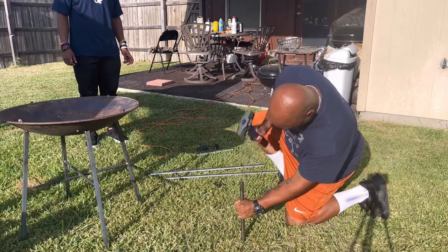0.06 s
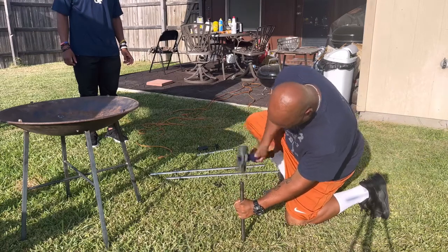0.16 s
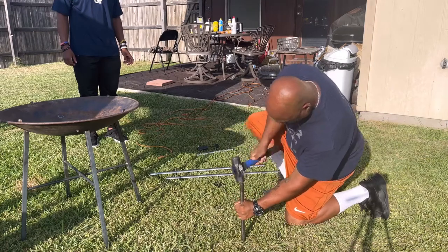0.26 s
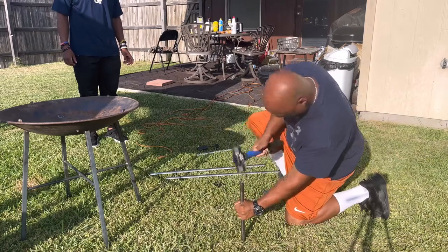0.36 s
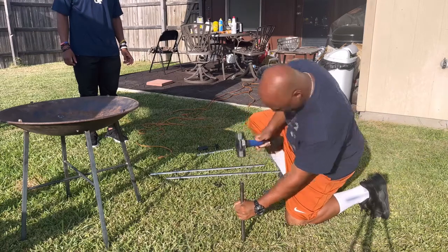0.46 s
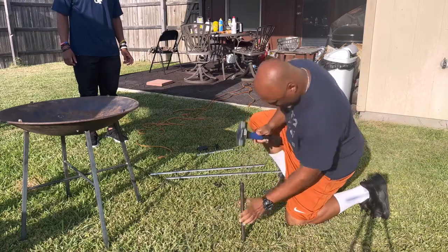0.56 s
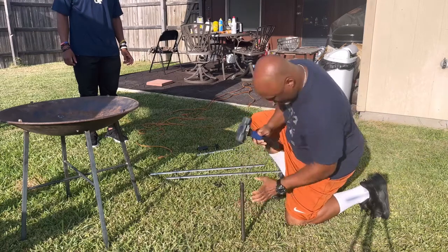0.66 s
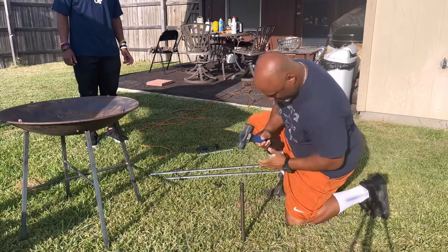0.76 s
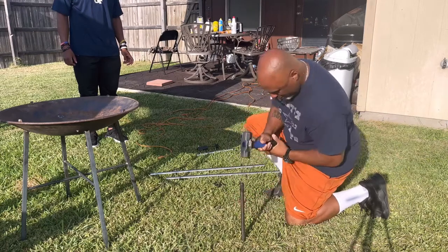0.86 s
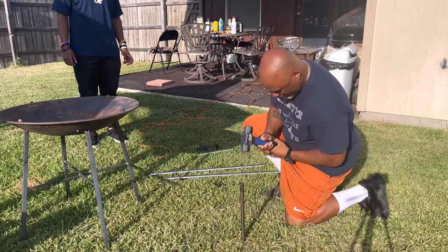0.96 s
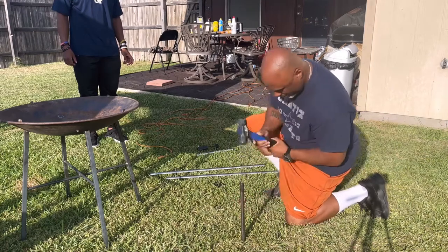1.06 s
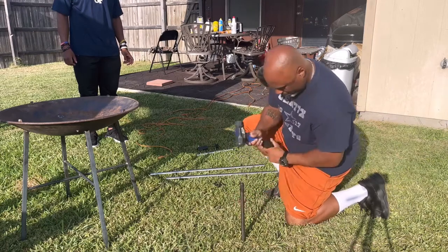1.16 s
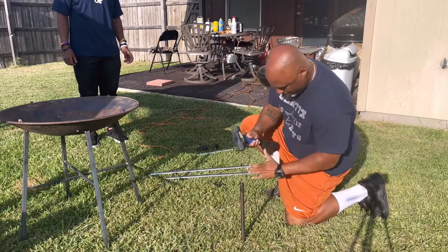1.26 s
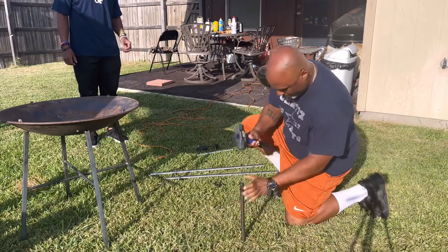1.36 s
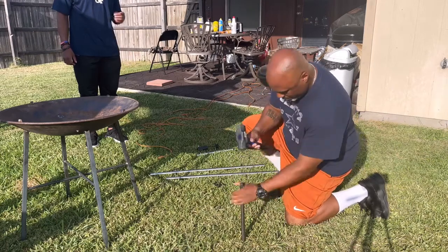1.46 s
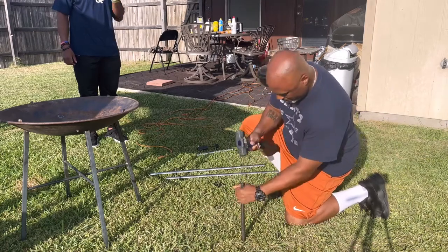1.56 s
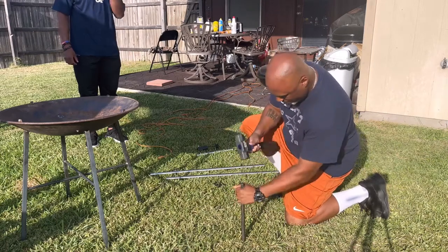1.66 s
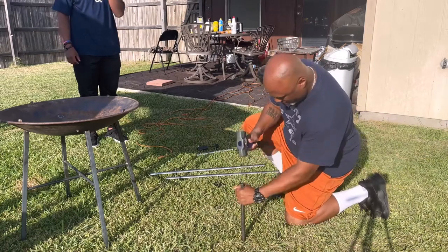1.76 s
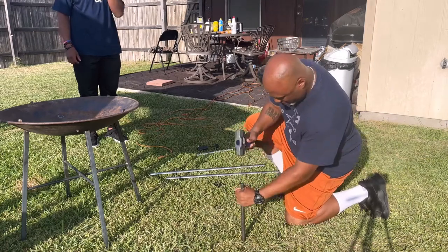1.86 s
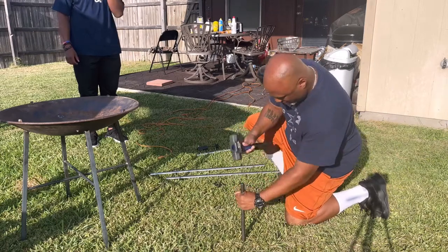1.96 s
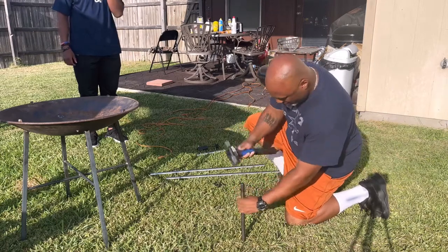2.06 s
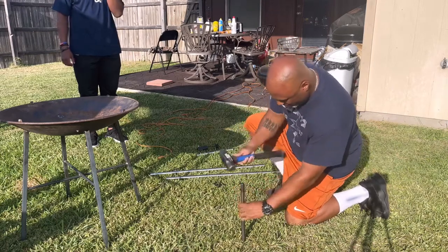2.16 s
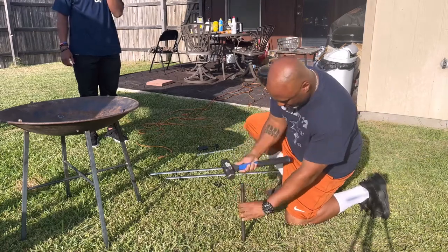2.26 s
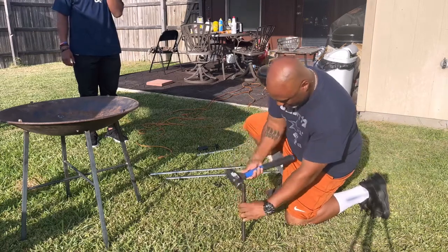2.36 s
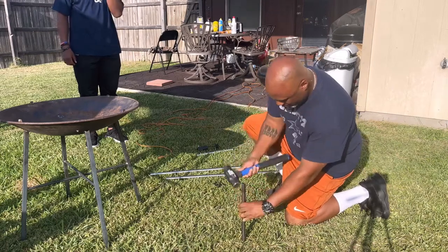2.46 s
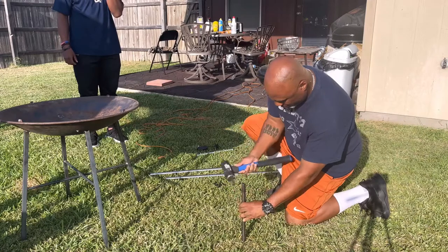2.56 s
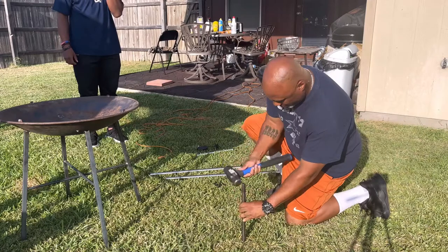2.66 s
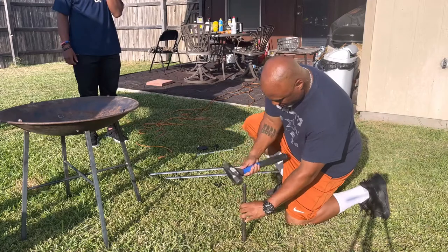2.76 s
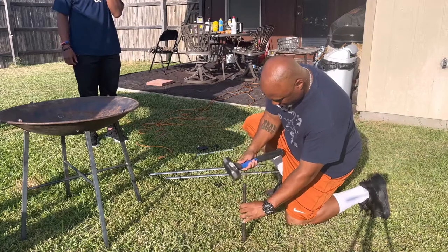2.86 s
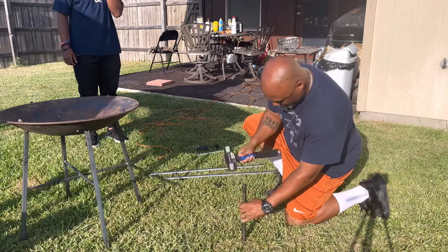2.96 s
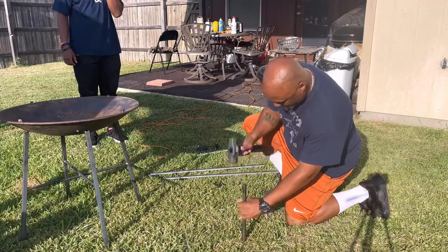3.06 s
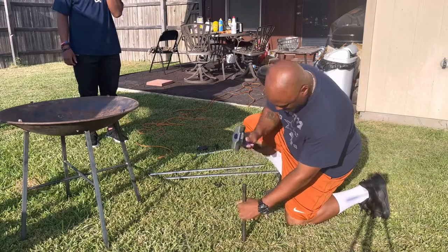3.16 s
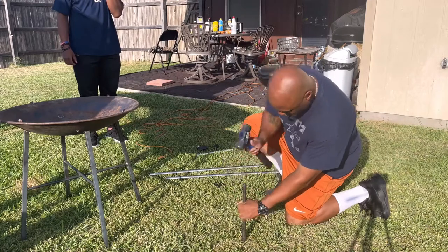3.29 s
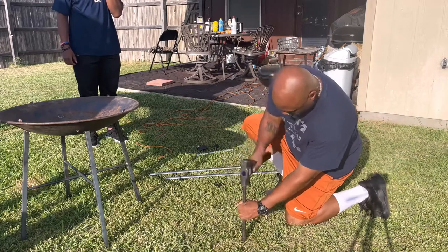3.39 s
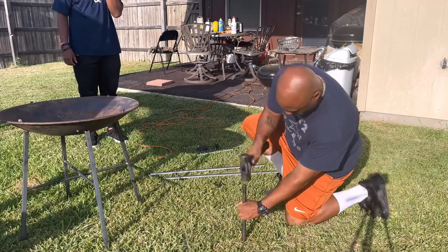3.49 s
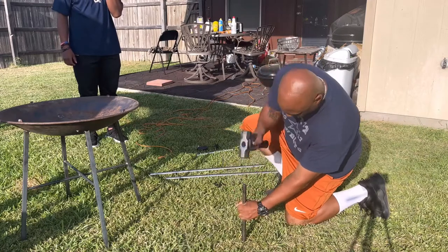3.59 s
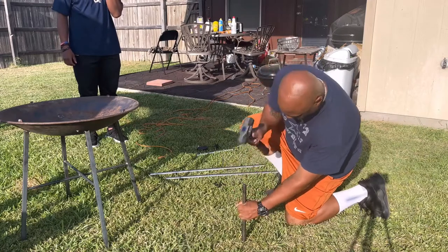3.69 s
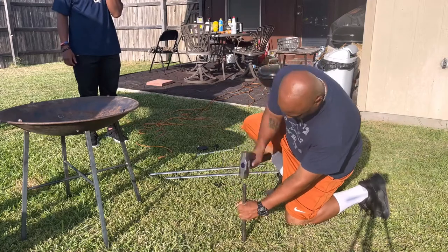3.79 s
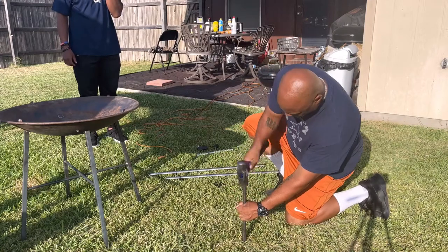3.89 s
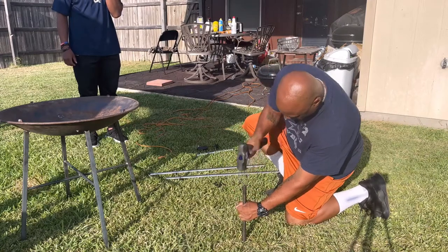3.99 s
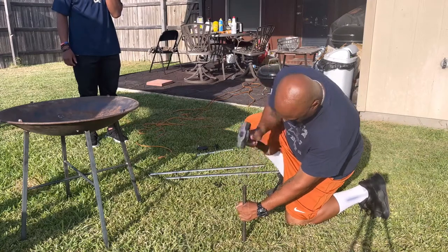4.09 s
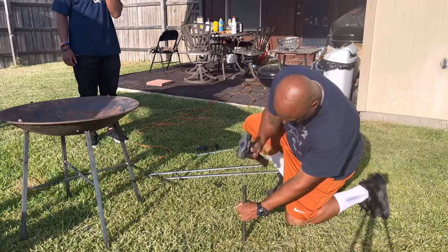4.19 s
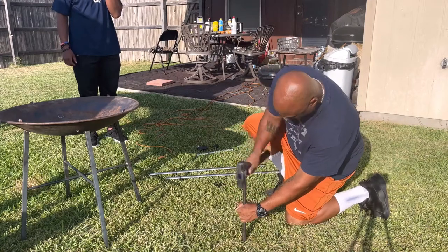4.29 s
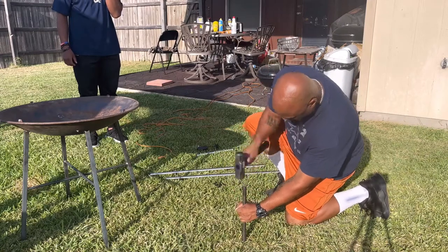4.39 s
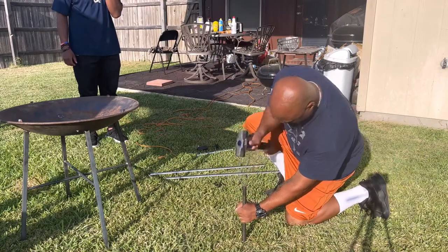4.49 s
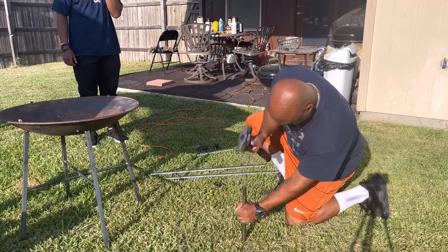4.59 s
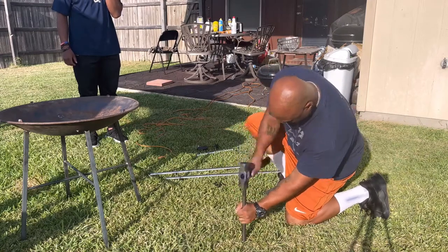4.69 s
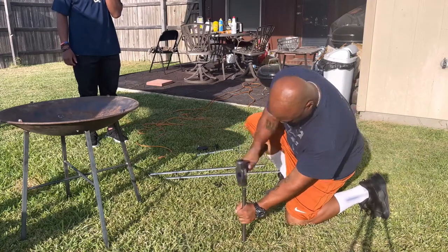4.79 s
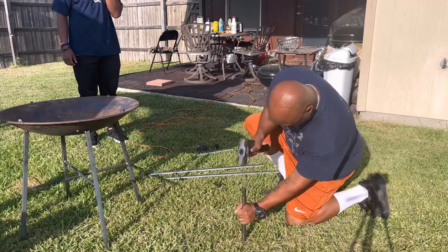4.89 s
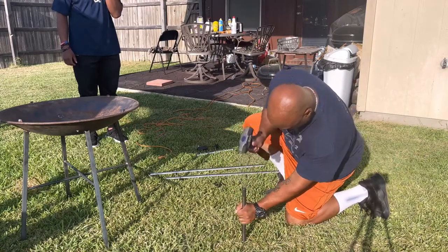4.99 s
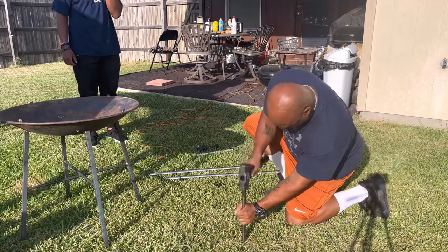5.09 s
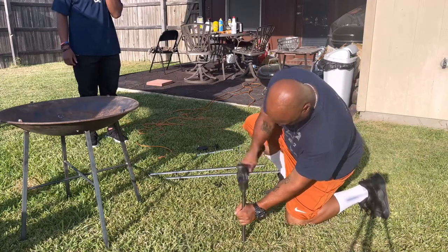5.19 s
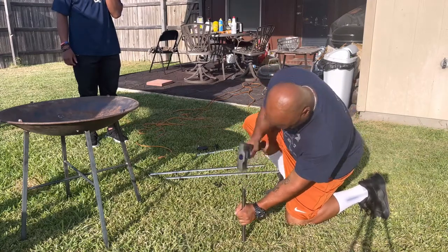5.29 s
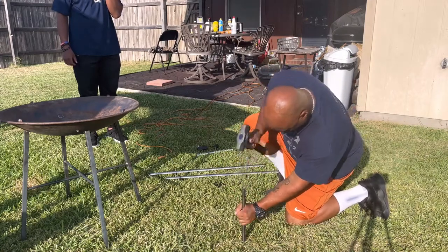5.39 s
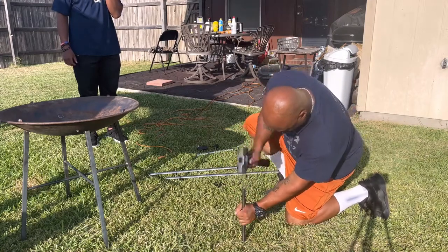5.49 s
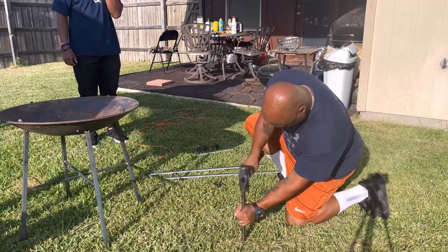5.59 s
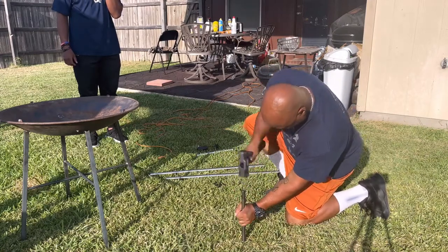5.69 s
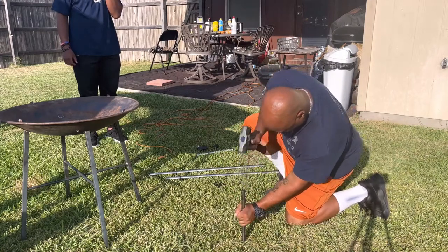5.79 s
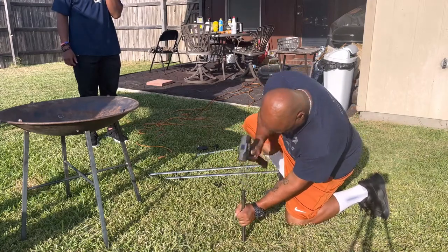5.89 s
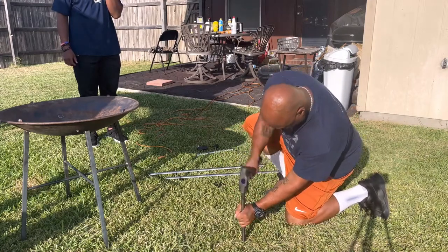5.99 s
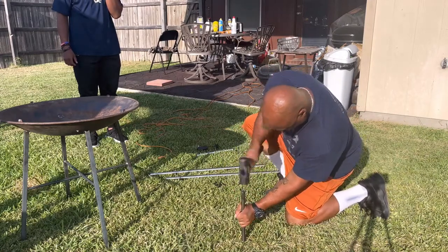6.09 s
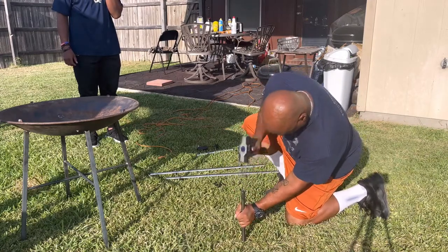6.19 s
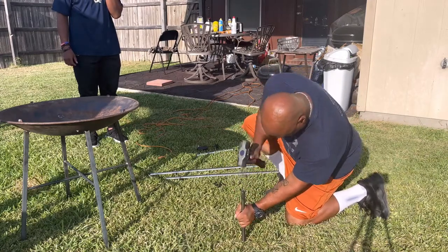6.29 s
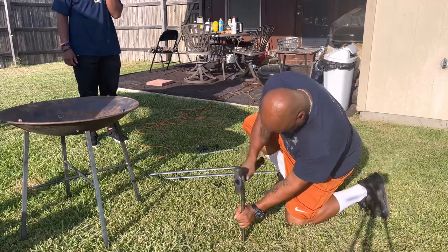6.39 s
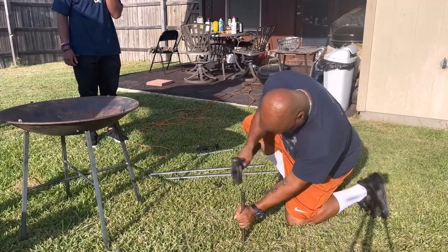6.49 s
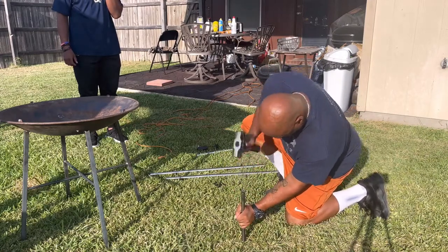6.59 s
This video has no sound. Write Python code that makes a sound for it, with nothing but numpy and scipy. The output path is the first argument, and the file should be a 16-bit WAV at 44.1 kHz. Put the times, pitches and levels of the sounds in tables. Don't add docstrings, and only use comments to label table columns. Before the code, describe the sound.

A hand hammer cracks sharply on a steel stake in a lawn, one blow, a pause, light taps, then steady hard blows with yard echoes.

```python
import sys
import numpy as np
from scipy import signal
from scipy.fft import rfft, irfft, next_fast_len
from scipy.io import wavfile

SR = 44100
rng = np.random.default_rng(int(sys.argv[2]) if len(sys.argv) > 2 else 0)


def natural_amplitude(level_db):
    exponent = np.asarray(level_db, float) / 20
    return 10 ** exponent


def store_wav(level_fs):
    pcm = np.round(np.clip(np.atleast_2d(level_fs), -1, 1) * 32767)
    wavfile.write(sys.argv[1], SR, pcm.T.astype(np.int16))


N = 293265
LEAD = SR // 2

# time_s, level_db
BREEZE = [(0.0, -55.5), (0.35, -49), (0.7, -59), (0.91, -56.5), (1.3, -48.5), (1.47, -50.5), (1.55, -65.5),
          (2.18, -71.5), (2.75, -54.5), (3.1, -70.5), (3.7, -59), (4.31, -58), (5.0, -54), (5.74, -55.5),
          (6.65, -57)]
# peak_s, peak_db, left_minus_right_db, half_width_s
GUSTS = [(0.43, -42.5, -6, 0.036), (0.67, -52, 0, .015), (0.91, -55, 1.5, 0.013), (1.131, -44, -6, 0.023),
         (1.26, -35.5, -3, 0.0085), (1.421, -43.5, -3, 0.0075), (1.95, -61, 3, .04), (2.18, -59, 7, 0.023),
         (2.59, -59, 9, 0.026), (2.798, -37.5, -2.5, 0.013), (4.32, -53, -1, 0.025),
         (5.091, -47.5, -5, 0.037), (5.23, -66, -1.5, 0.005), (5.371, -51.5, -2, 0.019),
         (5.632, -45.5, -5, 0.031), (5.77, -46, -3, 0.019), (6.02, -49, -2, 0.025), (6.18, -55, 3, 0.012),
         (6.398, -49, 1.5, 0.028)]

# pitch_hz, density_db (per Hz)
FAR_SPECTRUM = [(18, -37), (30, -7), (70, -2), (124, -12), (394, -9.5), (600, -9), (1320, -12),
                (2750, -39.5), (4300, -35.5), (8520, -56), (9970, -47.5), (10800, -63), (16000, -72.5)]
# pitch_hz, likeness (-1 to 1)
FAR_LIKENESS = [(60, 0.31), (180, 0.81), (550, -0.47), (1650, -0.21), (4970, 0.48), (15000, 0.38)]

# time_s, level_db
HUM_LEVEL = [
    (0.0, -68),
    (0.35, -66.5),
    (0.54, -57),
    (0.63, -67.5),
    (0.8, -56.5),
    (1.17, -68.5),
    (1.6, -77),
    (1.9, -89),
]
# pitch_hz, level_db
HUM_LINES = [
    (154, -5.5),
    (308, 1.5),
    (460, -5.5),
    (616, -12),
]

# contact_s, strength_db, glancing (up to 1, below 0 dead square), head_twist (0-1), off_centre (0-1)
BLOWS = [(0.196, -14, -0.29, 0, 0), (2.3358, -26, 0.93, 0.026, 0.3), (2.69, -24, 0.79, 0.33, .1),
         (3.3902, -13, -0.11, 0.017, 0.53), (3.826, -11.5, 0.02, 0, 0),
         (4.2615, -10.5, -0.076, 0.093, 0.57), (4.6921, -11, -0.12, 0.098, 0.34),
         (5.11, -11.5, -0.27, 0, .95), (5.5395, -12, -0.007, 1, 0.18), (5.9624, -11.5, -0.03, 0.13, 0.22),
         (6.3592, -12, -0.058, 0.089, 0)]
# pitch_hz, level_db, t60_s
STAKE_MODES = [
    [(1930, -5.5, 0.013), (2127, 1.5, 0.015), (2187, -8.5, 0.005), (2650, -7.5, 0.004)],
    [(782.2, -9, 0.096), (1021.4, 5, 0.024)],
    [(1286, -4, 0.032), (1530, -2, 0.014)],
    [(2850, -6.5, 0.015), (3112, 2, 0.014), (3404, 1, .014)],
    [(3520, -4, 0.004), (3920, 0.5, 0.027)],
]
HEAD_MODES = [
    [(5244, 1, 0.041), (5425, 3.9, 0.044), (5510, -4.5, .02)],
    [(4708, 0.011, 0.054), (4610, -9.5, 0.02)],
    [(6640, 9.5, .018), (6390, -11.5, .012)],
    [(8520, 0.0042, 0.033)],
]
FACE_MODES = [
    [(10320, 0, .014), (10920, 1, 0.028)],
    [(9610, 0.0019, 0.034)],
    [(13000, 0, .01)],
    [(15550, 0.0085, .04)],
]
RADIATION = [
    (17.9, 21.84, 19.7, 24.4, 21),
    (17.36, 23.7, 16.5, 18),
    (17.34, 22, 17, 15),
]
# near_2200hz_db, near_900hz_db, near_1400hz_db, near_3100hz_db, near_4000hz_db
STAKE_SHARE = [
    (0.22, -8, -9.5, -7, -23),
    (-3, -14.5, 5.5, 3, 21),
    (-0.1, 0.5, -5.7, 3.5, 12),
    (0, -3, -3.8, 4.5, -2.1),
]
# near_5400hz_db, near_4700hz_db, near_6500hz_db, near_8500hz_db
HEAD_SHARE = [
    (-4.5, -14, -7.5, -10),
    (6, -4.3, 2.5, -1.6),
    (-7, 18.5, 8, 4),
    (-1.5, 0.4, 2.1, -0.45),
]
# near_10800hz_db, near_9600hz_db, near_13000hz_db, near_15500hz_db
FACE_SHARE = [
    (-4.5, -17, -29, -8.5),
    (4, -1, -12.5, -4),
    (0.6, 3.2, 4.4, 3.5),
    (-7, 24.5, 10, -5),
]
# fast_wave_db, slower_wave_db, slowest_wave_db
SOIL_SHARE = [
    (-7, -14.5, -22),
    (-8.5, 17.5, 3),
    (-2.5, 2.5, 10.5),
    (-1.8, 0.8, 0),
]
# narrow_db, broad_db
CLACK_SHARE = [
    (-11, 4.2),
    (22, 2),
    (4.5, -1.5),
    (-0.8, -3.4),
]
# pitch_hz, level_db, rise_s, t60_s
SOIL_WAVES = [
    [(436, -4.5, 0.0037, 0.026), (282, -4.5, 0.0076, 0.01)],
    [(152, 3, 0.013, 0.056)],
    [(81, 3, 0.02, 0.05)],
]

# pitch_hz, left_minus_right_db
PORT_SHADE = [(300, -2), (600, -2.5), (1500, -6), (2000, -1), (3700, 2), (4600, -9), (5400, -3),
              (6500, -11.5), (7600, -8), (10000, 0.5), (15500, -2)]
# pitch_hz, left_lead_rad
PORT_LEAD = [(300, 0), (600, -.6), (1500, -.1), (2000, -1), (3700, -2.3), (4400, -3.1), (5400, -5),
             (7600, -7.3), (8500, -6), (10000, -5.1), (12500, -3.2), (15500, -.3)]
# delay_s, level_db
LAWN_ECHO = (.0045, -9)
# delay_s, left_db, right_db, smear_s
YARD_ECHOES = [(.0135, 10, 10.5, 0.0026), (.0185, 5, 9, 0.0041), (.024, -1, -0.5, .003),
               (0.04, 10, 6.5, 0.0034), (0.045, 7, 7.5, .003), (0.059, 3, -19, 0.0016),
               (0.083, 2, 13.5, 0.0019), (.099, 5, 13, 0.0011), (.126, -11, 13.5, 0.00098),
               (0.14, 11, 11.5, 0.0033), (0.152, 13.5, 5.5, 0.0015), (0.164, -5.5, 6, 0.0059),
               (0.19, 8, 7, 0.002), (0.228, -7, 7.5, 0.0026)]
# pitch_hz, left_db, right_db, t60_s
YARD_TAIL = [(150, -48, -44.5, 0.05), (348, -41, -41.5, 0.15), (790, -52.5, -54.5, 0.41),
             (1300, -47.5, -48.5, 0.53), (2200, -52, -48.5, 0.51), (3330, -56.5, -57, 0.47),
             (4000, -46, -42, 1), (4700, -52.5, -41.5, 0.57), (5700, -51.5, -35.5, 0.62),
             (7370, -45, -49, 0.44), (9300, -51.5, -52, 0.45), (12000, -55, -53.5, 0.16),
             (16700, -47.5, -45, .45)]
# delay_s, left_db, right_db
FENCE_SLAP = [
    (0.0838, -16, -9),
    (0.0911, -28, -15),
]

# peak_s, level_db, half_width_s
RUSTLES = [
    (0.99, -87, .02),
    (1.139, -80, .045),
    (1.9, -87, .04),
    (2.11, -95, .015),
]
# start_s, peak_db
TICKS = [
    (0.5294, -87),
    (0.5794, -90.5),
    (0.6848, -64),
    (0.9794, -74),
    (1.0594, -86),
]
# start_s, peak_db, length_s, start_hz
CHIRPS = [
    (0.77, -87, .03, 3930),
    (0.893, -69, .09, 4490),
    (1.28, -81, .08, 4100),
    (1.396, -71, .09, 4750),
    (1.496, -81, .12, 4700),
    (1.784, -72, 0.078, 4390),
    (1.92, -80.5, .12, 4250),
    (3.23, -83, .09, 4170),
]


def rms_one(x):
    return x / np.sqrt(np.mean(x ** 2) + 1e-20)


def in_time(rows, outside=None):
    s, *columns = np.transpose(rows)
    return [np.interp(np.arange(N) / SR, s, c, outside, outside) for c in columns]


def at_hz(rows, hz, order=1):
    rows = np.array(rows)
    return np.interp(np.log(hz), np.log(rows[:, 0]), rows[:, order])


def band(x, low_hz, high_hz, order=2):
    edges = [low_hz, min(high_hz, .45 * SR)]
    return signal.sosfilt(signal.butter(order, edges, "band", fs=SR, output="sos"), x)


def drift(rate_hz, channels=1):
    r = np.exp(-2 * np.pi * rate_hz / SR)
    white = rng.standard_normal((channels, N + LEAD))
    return rms_one(signal.lfilter([1], [1, -2 * r, r * r], white)[:, LEAD:])


def bump(s, width):
    return np.exp(-.5 * ((np.arange(N) / SR - s) / max(width, .003)) ** 2)


def half_octaves(count):
    edges = 90 * 2 ** np.arange(0, count / 2, .5)
    return zip(edges, edges[1:])


def wind():
    power = natural_amplitude(in_time(BREEZE)[0] + 2.5 * drift(14.0, channels=2)) ** 2
    for s, peak_db, pan_db, width in GUSTS:
        port_db = peak_db + pan_db * np.array([[.5], [-.5]])
        power = power + (natural_amplitude(port_db) * bump(s, width)) ** 2
    level_db = 10 * np.log10(power)
    lump_db = 2.7 * drift(38, channels=2)
    white = .5 * rng.standard_normal(N) + rng.standard_normal((2, N))
    rumble = rms_one(band(white, 42, 105) * natural_amplitude(lump_db))
    flutter_db = -21.5 + 0.32 * lump_db + 0.71 * (level_db + 51.5)
    flutter = rms_one(band(white, 105, 190, order=3)) * natural_amplitude(flutter_db)
    return natural_amplitude(level_db + 3.5) * (rumble + flutter)


def far_field():
    out, white = 0, rng.standard_normal((2, 2, N))
    for k, (low, high) in enumerate(half_octaves(15)):
        mid, side = band(white[k % 2], low, high, order=3)
        hz = np.sqrt(low * high)
        alike = np.clip(at_hz(FAR_LIKENESS, hz), -1, 1)
        stereo = np.sqrt(1 + alike) * mid + np.sqrt(1 - alike) * side * [[1], [-1]]
        out = out + natural_amplitude(at_hz(FAR_SPECTRUM, hz)) * stereo
    return natural_amplitude(-58.5 + 0.5 * drift(7.5)) * rms_one(out)


def insects():
    return natural_amplitude(-84.5) * rms_one(band(rng.standard_normal((2, N)), 9250, 10300, order=7))


def hum():
    turns = np.cumsum(1 + 0.016 * drift(3.4)[0]) / SR
    tones = sum(natural_amplitude(db - 2.5) * np.sin(2 * np.pi * hz * turns) for hz, db in HUM_LINES)
    return natural_amplitude(in_time(HUM_LEVEL, outside=-91.0)[0]) * tones


def shares(table):
    rows = np.array(BLOWS)
    levels = np.array(table[0]) + rows[:, 2:] @ np.array(table[1:])
    levels[:, 0] += rows[:, 1]
    return [tuple(row) for row in levels]


def steel(body, radiation_db, levels_db, t):
    grip_damping = 0.68
    contact_spread = 1.12
    out = 0
    for modes, gain_db in zip(body, np.add(radiation_db, [0, *levels_db[1:]])):
        hz, level_db, t60 = np.transpose(modes)[:, :, None]
        luck = rng.standard_normal((3, len(modes), 1))
        decay = natural_amplitude(level_db + 2.7 * luck[0] - 60 * t / t60 / grip_damping)
        struck_hz = hz * (1 + 0.0038 * luck[1])
        rings = decay * np.sin(2 * np.pi * struck_hz * t + 3 * luck[2])
        contact = band(rng.standard_normal(len(t)), hz.min() / contact_spread, hz.max() * contact_spread)
        crack = rms_one(contact) * natural_amplitude(-2.5 - 60 * t / 0.018)
        squeeze = (1 - np.exp(-t / 0.00081)) ** 2
        group = (rings.sum(axis=0) + crack) * squeeze
        out = out + natural_amplitude(levels_db[0] + gain_db) * group / np.linalg.norm(group)
    return out


def snap(strength_db, t):
    envelope = natural_amplitude(strength_db - 11.5 - 60 * t / 0.024) * (1 - np.exp(-t / 0.00038))
    burst = rng.standard_normal(len(t)) * envelope
    return band(burst, 550, 3000) + natural_amplitude(-8.5) * band(burst, 5500, 11200, order=3)


def soil(levels_db, t):
    out = 0
    for waves, rel_db in zip(SOIL_WAVES, [0, *levels_db[1:]]):
        for hz, level_db, rise, t60 in waves:
            onset = np.sin(np.pi / 2 * np.minimum(t / rise, 1)) ** 2
            swell = onset * natural_amplitude(-60 * np.maximum(t - rise, 0) / t60)
            gain = natural_amplitude(levels_db[0] + rel_db + level_db + 2.5)
            out = out + gain * swell * np.sin(2 * np.pi * hz * (t - rise))
    return out


def hammer():
    earlier_s, earlier_db = -.235, -1
    metal, ground = np.zeros((2, N + 2 * LEAD))
    t = np.arange(SR // 8) / SR
    times = [row[0] for row in BLOWS]
    bodies = (STAKE_MODES, HEAD_MODES, FACE_MODES)
    for body, radiation_db, table in zip(bodies, RADIATION, (STAKE_SHARE, HEAD_SHARE, FACE_SHARE)):
        levels = shares(table)
        levels.append((levels[0][0] + earlier_db, *levels[0][1:]))
        for s, levels_db in zip([*times, earlier_s], levels):
            metal[LEAD + round((s - .0009) * SR):][:len(t)] += steel(body, radiation_db, levels_db, t)
    for s, levels_db in zip(times, shares(SOIL_SHARE)):
        ground[LEAD + round(s * SR):][:len(t)] += soil(levels_db, t)
    for s, strength_db, *_ in BLOWS:
        metal[LEAD + round((s - .0005) * SR):][:len(t)] += snap(strength_db, t)
    return metal, ground


def sideways():
    out, t = np.zeros(N + 2 * LEAD), np.arange(SR // 40) / SR
    for (s, *_), (peak_db, broad_db) in zip(BLOWS, shares(CLACK_SHARE)):
        burst = rng.standard_normal((2, len(t))) * natural_amplitude(-60 * t / 0.013)
        narrow = rms_one(band(burst[0], 3500, 4900))
        broad = rms_one(band(burst[1], 2400, 6400, order=3))
        out[LEAD + round(s * SR):][:len(t)] += natural_amplitude(peak_db - 21.0) * (narrow + natural_amplitude(broad_db) * broad)
    return out


def ports(x):
    size = next_fast_len(len(x))
    hz = np.fft.rfftfreq(size, 1 / SR) + 1
    half = np.sqrt(natural_amplitude(at_hz(PORT_SHADE, hz)) + 0j) * np.exp(1j * at_hz(PORT_LEAD, hz) / 2)
    return irfft(rfft(x, size) * np.array([half, 1 / half]), size)[:, :len(x)]


def yard():
    t = np.arange(SR * 3 // 4) / SR
    power = np.ones((2, 1)) * np.clip((t - .006) / 0.0013, 0, 1)
    for s, left_db, right_db, smear in YARD_ECHOES:
        excess = natural_amplitude([[left_db], [right_db]]) ** 2 - 1
        power = power + excess * (t > s) * np.exp(-np.maximum(t - s, 0) / smear)
    shared, own = rng.standard_normal((2, 1, len(t))), rng.standard_normal((2, 2, len(t)))
    scatter = (0.49 * shared + 1.68 * own) * np.sqrt(np.maximum(power, 0))
    out = 0
    for k, (low, high) in enumerate(half_octaves(16)):
        hz = np.sqrt(low * high)
        level_db = np.array([[at_hz(YARD_TAIL, hz)], [at_hz(YARD_TAIL, hz, order=2)]])
        decay_db = -60 * t / at_hz(YARD_TAIL, hz, order=3)
        out = out + band(scatter[k % 2] * natural_amplitude(level_db + decay_db), low, high)
    notch = signal.butter(3, [11400, 14900], "bandstop", fs=SR, output="sos")
    return signal.sosfilt(notch, out)


def fence(metal, clack):
    slap = band(clack + natural_amplitude(-5) * metal, 4080, 6250)
    out = 0
    for s, left_db, right_db in FENCE_SLAP:
        out = out + natural_amplitude([[left_db], [right_db]]) * np.roll(slap, round(s * SR))
    return out


def rustle():
    swells = sum(natural_amplitude(db) * bump(s, width) for s, db, width in RUSTLES)
    level = swells * natural_amplitude(6.0 + 2.3 * drift(120))
    for s, peak_db in TICKS:
        level[:, round(s * SR):][:, :900] += natural_amplitude(peak_db - 60 * np.arange(900) / SR / 0.016)
    return level * rms_one(band(rng.standard_normal((2, N)), 5750, 15500))


def birds():
    attack_s, fade_db_per_s, sag_hz_per_s = 0.005, 63.5, 8600
    level, hz, now = np.zeros(N), np.full(N, 4000.), np.arange(N) / SR
    for s, peak_db, length, start_hz in CHIRPS:
        age = now - s
        on = (age > 0) & (age < length)
        edges = np.clip(np.minimum(age, length - age) / attack_s, 0, 1)
        level[on] = (edges * natural_amplitude(peak_db - fade_db_per_s * np.maximum(age, 0)))[on]
        hz[on] = start_hz - sag_hz_per_s * age[on]
    trill_hz = [[31], [43]] * natural_amplitude(1.1 * drift(32, channels=2))
    sweep = 1 - 2 * (np.cumsum(trill_hz, axis=1) / SR % 1)
    pitch = hz + 620 * sweep + 200 * drift(23, channels=2)
    voices = (1 - sweep ** 2) * np.sin(2 * np.pi * np.cumsum(pitch, axis=1) / SR)
    out = level * voices.sum(axis=0)
    t = np.arange(SR // 3) / SR
    blur = rng.standard_normal((2, len(t))) * natural_amplitude(-60 * t / 0.46)
    return natural_amplitude(10) * signal.fftconvolve(out[None], blur / np.linalg.norm(blur[0]))[:, :N]


def scene():
    metal, ground = hammer()
    clack = sideways()
    lawn_s, lawn_db = LAWN_ECHO
    off_lawn = natural_amplitude(lawn_db) * np.roll(metal, round(lawn_s * SR))
    direct = metal + ground + off_lawn
    direct = direct + natural_amplitude(-29.5) * np.roll(band(metal, 660, 2800), -round(0.0012 * SR))
    echoes = signal.fftconvolve((metal + ground + clack)[None], yard())[:, :len(metal)]
    heard = ports(direct) + echoes + fence(metal, clack)
    return heard[:, LEAD:LEAD + N] + wind() + far_field() + insects() + hum() + rustle() + birds()


def low_pass(x):
    return signal.sosfilt(signal.butter(12, 17110, fs=SR, output="sos"), x)


def record(dry):
    x = signal.sosfilt(signal.butter(2, 38, "high", fs=SR, output="sos"), dry)
    x = x / (1 + (x / .95) ** 4) ** .25
    x = signal.sosfilt(signal.cheby2(10, 50, 16900, fs=SR, output="sos"), x)
    return low_pass(x)


dry = scene()
out = record(dry)
store_wav(out)
```